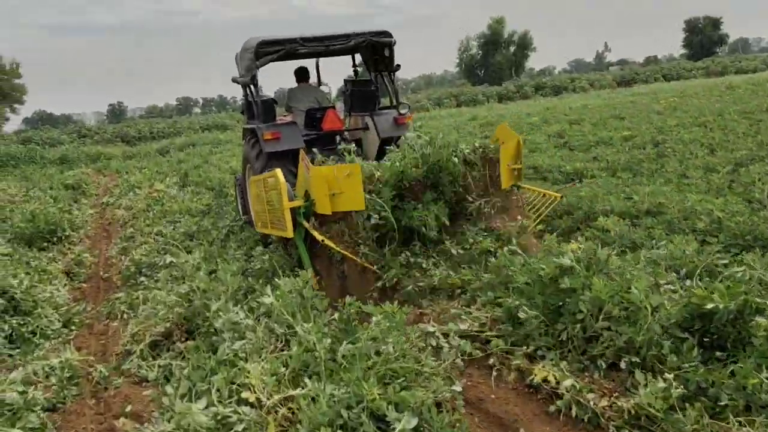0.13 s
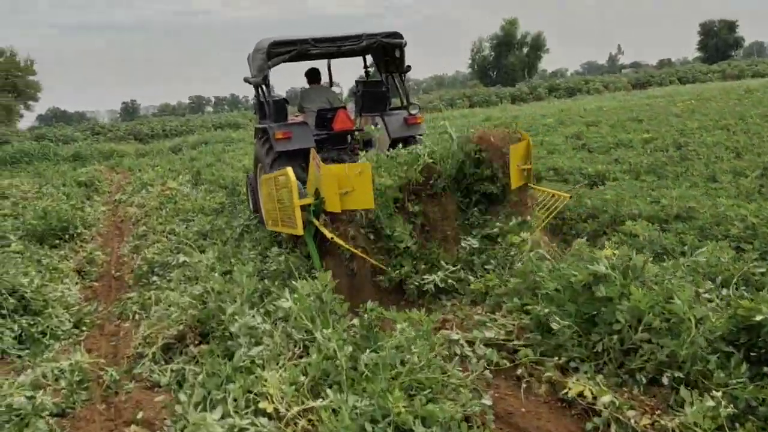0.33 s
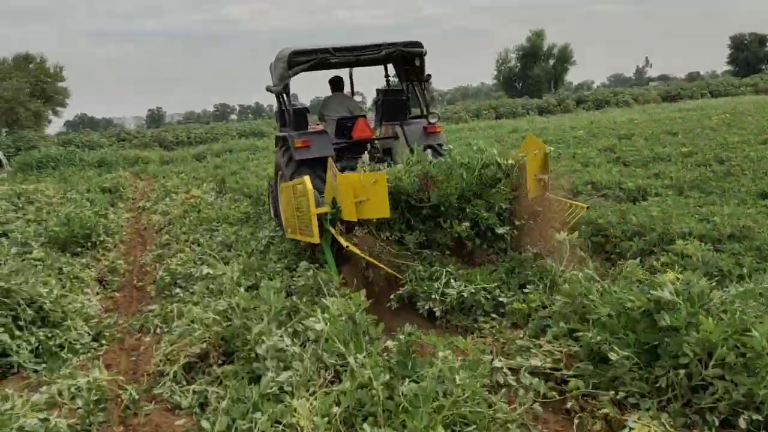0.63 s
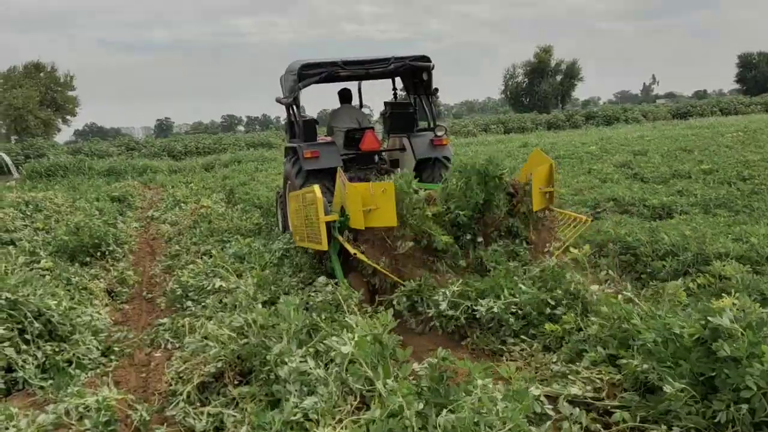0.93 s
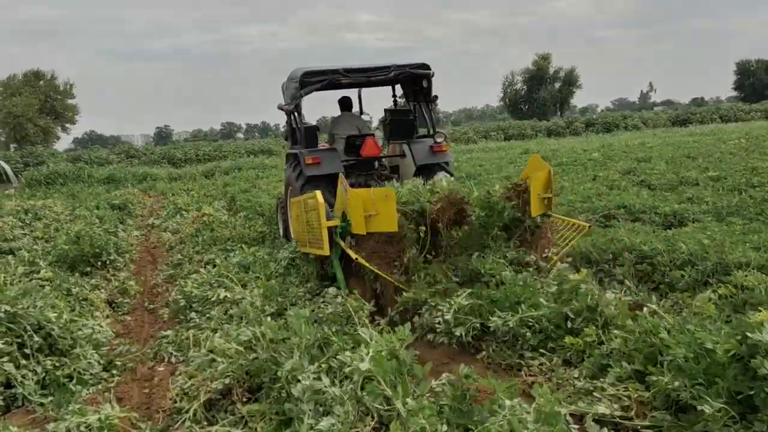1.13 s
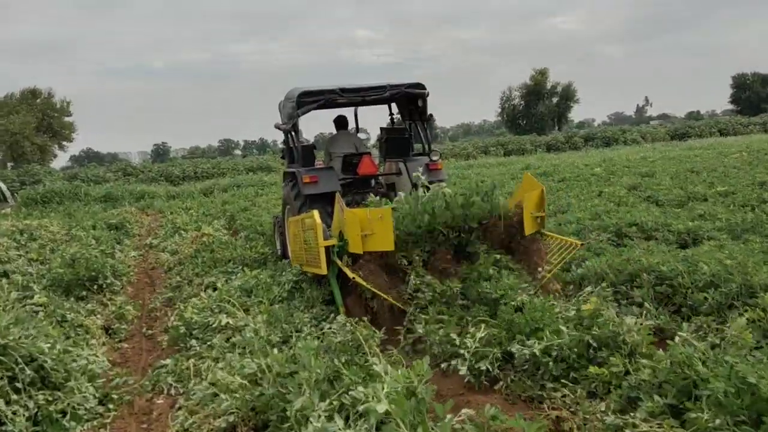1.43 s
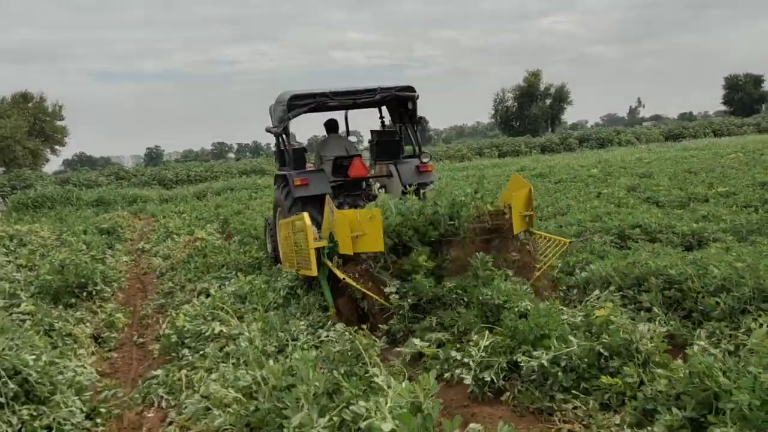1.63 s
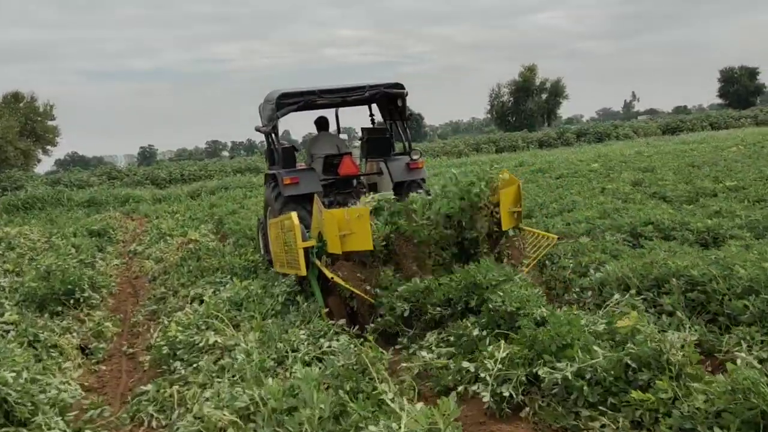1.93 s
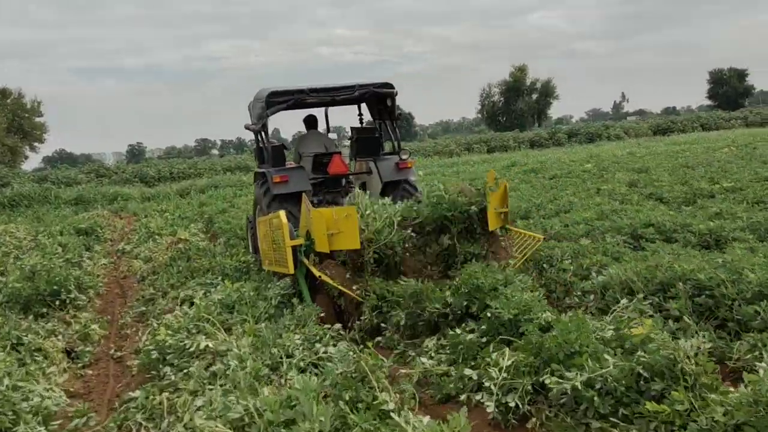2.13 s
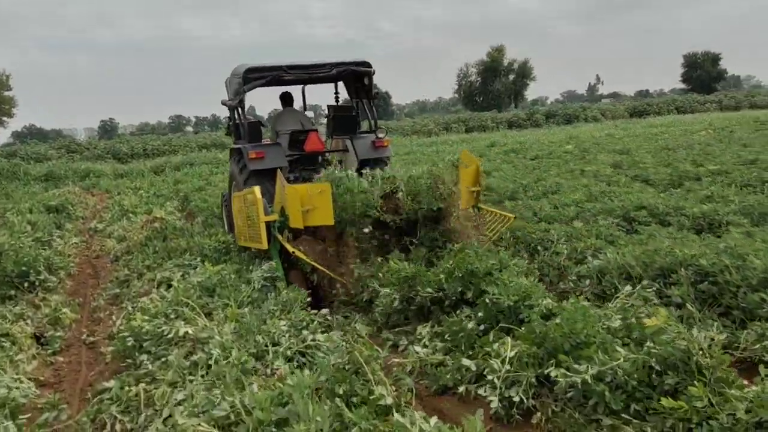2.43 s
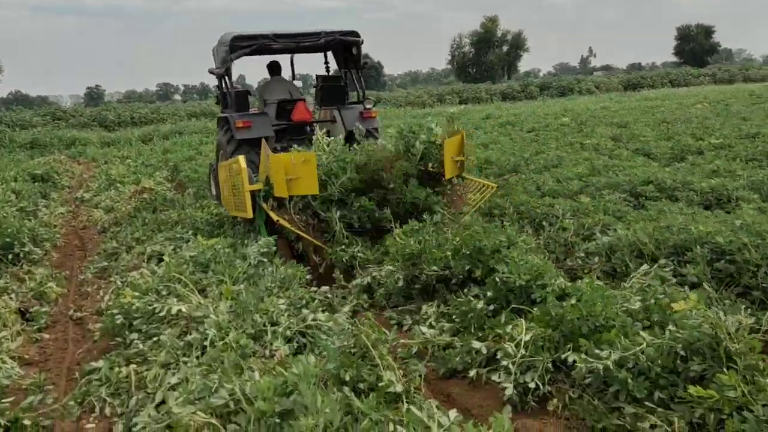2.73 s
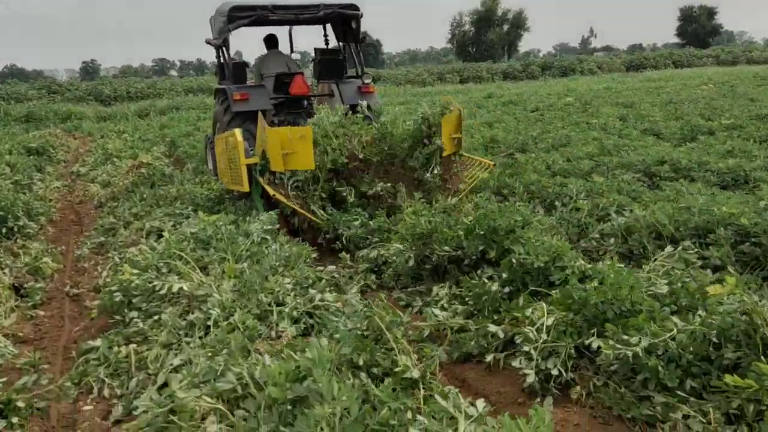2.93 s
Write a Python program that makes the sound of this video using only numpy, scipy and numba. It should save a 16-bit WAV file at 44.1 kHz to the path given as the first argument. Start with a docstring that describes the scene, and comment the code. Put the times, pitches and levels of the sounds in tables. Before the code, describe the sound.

A tractor's diesel engine hums and rumbles while its chain digger rattles loose metal continuously, some metres ahead of a hand-held phone in an open field; strong wind buffets the left side, then eases after midway.

```python
"""A diesel tractor drags a chain digger through a leafy field, some metres ahead of a hand-held phone.
Chain links and engine knock rattle loose sheet metal, built from many struck, wavering resonances.
The exhaust hums as sines on shaft orders; bright ticks, on some shaft turns, are clusters of brief partials.
Filtered noise makes the engine's low rumble and the gusts of wind that buffet the two microphone ports,
the left one most."""
import sys
import numpy as np
from scipy import signal
from scipy.fft import rfft, irfft
from scipy.io import wavfile
from scipy.ndimage import uniform_filter1d, map_coordinates
from numba import njit

SR = 44100
rng = np.random.default_rng(int(sys.argv[2]) if len(sys.argv) > 2 else 0)


def store_pcm(level_fs):
    """Save levels as 16-bit WAV."""
    pcm = np.round(np.clip(level_fs, -1, 1) * 32767).astype(np.int16)
    wavfile.write(sys.argv[1], SR, np.atleast_2d(pcm).T)


def gain_from_db(level_db):
    """Turn a decibel level (scalar or array-like) into a linear amplitude factor."""
    decades = np.asarray(level_db, float) / 20
    return 10 ** decades


N = 135387  # length in samples


def table(rows, x, col=1, log=False):
    """Read a column of a table along straight lines, on a log axis if asked."""
    a = np.array(rows, float)
    if log:
        return np.interp(np.log(x + 1), np.log(a[:, 0] + 1), a[:, col])
    return np.interp(x, a[:, 0], a[:, col])


def unit(x):
    """Scale to rms 1."""
    return x / np.sqrt(np.mean(x ** 2))


def walk(rate_hz, count=1, size=N, sr_hz=SR):
    """Random levels of rms 1, held for 1 / rate seconds and smoothed twice."""
    hold = max(int(sr_hz / rate_hz), 1)
    levels = rng.standard_normal((count, size // hold + 1))
    steps = np.repeat(levels, hold, axis=1)[:, :size]
    return unit(uniform_filter1d(uniform_filter1d(steps, hold), hold))


def shaped(x, gain):
    """Filter by a gain given on the frequency axis."""
    return irfft(rfft(x) * gain, N)


@njit
def ring(clicks, gate, pole, lag, gain, row):
    """Sum decaying resonances, each driven by gated clicks from its own starting point."""
    out = np.zeros(gate.shape[1])
    for m in range(len(pole)):
        z = 0j
        for i in range(len(out)):
            block = i >> 7  # pole and gain change every 128 samples
            strike = clicks[i + lag[m]] * gate[row[m], i] * gain[m, block]
            z = z * pole[m, block] + strike
            out[i] += z.imag
    return out


# Edges between the five rattle bands, low to high. Each entry: frequency in Hz.
BAND_EDGES_HZ = [850, 1300, 1950, 4700]
# Single panels that ring up for a while.
# Each row: middle in seconds, length in seconds, pitch in Hz, rise in dB.
RING_UPS = [(.26, 0.16, 1550, 12.5), (0.323, 0.14, 2345, 15), (0.462, 0.12, 2170, 17.5),
            (0.642, 0.082, 1990, 16.5), (0.87, 0.027, 2218, 21), (1.698, 0.085, 1120, 13.5),
            (1.874, 0.14, 654, 10), (1.955, .13, 1760, 9), (2.04, 0.095, 2260, 7.5), (2.127, .3, 2550, 12),
            (2.24, 0.14, 2130, 16), (2.243, 0.2, 1026, 11), (2.807, 0.3, 1225, 12.5),
            (2.82, 0.11, 1670, 11), (2.998, .12, 2550, 10)]
RING_UP_WIDTH = .014  # share of the pitch
PANEL_SPACE_HZ, PANEL_SPREAD = 40, .014  # spacing at the bottom, and its growth per Hz of pitch
PANEL_WIDTH_HZ, PANEL_WIDEN = 26, .009  # median bandwidth: a base, plus a share of the pitch
PANEL_WAVER, PANEL_WAVER_HZ = .007, 7  # pitch waver as a share, and its rate
PANEL_WALK_DB, PANEL_WALK_HZ, NEIGHBOUR_WALK_DB = 4.3, 12, 2
CLICK_SCATTER_DB = 2.2  # mean boost of a click


def panels(gate, count=125):
    """Loose metal rings at many pitches that waver and swell, partly with neighbours; three strikings."""
    u = (np.arange(count) + rng.uniform(0, 1, count)) / count
    stretch = np.log1p(PANEL_SPREAD * 15300 / PANEL_SPACE_HZ)
    hz = 200 + np.expm1(u * stretch) * PANEL_SPACE_HZ / PANEL_SPREAD
    width = (PANEL_WIDTH_HZ + PANEL_WIDEN * hz) * np.exp(.5 * rng.standard_normal(count))

    steps = N // 128 + 1
    slow = dict(count=count, size=steps, sr_hz=SR / 128)
    own = walk(PANEL_WALK_HZ, **slow)
    shared = unit(uniform_filter1d(walk(14, **slow), size=11, axis=0))
    t = np.arange(steps) * 128 / SR
    ups = 0
    for middle, length, pitch, rise_db in RING_UPS:
        near_pitch = np.exp(-(np.log(hz / pitch) / RING_UP_WIDTH) ** 2 / 2)
        near_time = np.exp(-(2 * (t - middle) / length) ** 4)
        ups = ups + rise_db * np.outer(near_pitch, near_time)
    swell = gain_from_db(ups + PANEL_WALK_DB * own + NEIGHBOUR_WALK_DB * shared)
    # wide or widely spaced rings are struck harder
    gain = swell * np.sqrt(width * (PANEL_SPACE_HZ + PANEL_SPREAD * hz))[:, None]

    waver = 1 + PANEL_WAVER * walk(PANEL_WAVER_HZ, **slow)
    pole = np.exp((2j * np.pi * hz[:, None] * waver - np.pi * width[:, None]) / SR)
    scatter = gain_from_db(CLICK_SCATTER_DB * rng.exponential(1, (3, 2 * N)))
    clicks = rng.standard_normal((3, 2 * N)) * scatter
    # each run of four neighbours takes the same stretch of clicks
    lag = rng.integers(0, N, count // 4 + 1)[np.arange(count) // 4]
    band = np.searchsorted(BAND_EDGES_HZ, hz)
    return rfft([unit(ring(c, gate, pole, lag, gain, band)) for c in clicks])


# Loudness of the rattle, band by band.
# Each row: time in seconds, then level in dB of the hiss (top band), the drone (lowest),
# the growl, the rasp and the clatter (rising in pitch).
RATTLE_LEVELS = [(0.0, -58.5, -48.5, -43, -46, -46.5), (0.04, -65, -56.5, -53, -55, -56),
                 (0.13, -62.5, -45, -48.5, -52.5, -51.5), (0.27, -60.5, -55, -51.5, -46.5, -49.5),
                 (0.36, -65, -47.5, -47.5, -53, -40.5), (0.39, -64, -53, -53, -51.5, -43.5),
                 (0.55, -67.5, -51, -55.5, -40, -48), (0.67, -55, -47.5, -45.5, -40.5, -38.5),
                 (0.91, -63, -52.5, -42.5, -40, -41), (0.93, -59, -42.5, -43, -45, -39),
                 (1.01, -64, -50, -46.5, -53, -43), (1.09, -66, -54, -49, -43, -47.5),
                 (1.17, -70, -44, -43, -50, -48.5), (1.22, -68.5, -50.5, -48, -56, -43),
                 (1.7, -58.5, -45.5, -40, -39, -42.5), (1.76, -58.5, -39, -41.5, -40, -36.5),
                 (1.97, -60.5, -49, -42.5, -45, -41.5), (2.02, -61.5, -48, -41, -47, -39.5),
                 (2.29, -67.5, -47.5, -43.5, -43.5, -41), (2.41, -61, -50, -49.5, -43, -42.5),
                 (2.85, -56, -51.5, -45, -40, -48), (3.07, -63.5, -51, -53.5, -50, -47.5)]
# How hard the chain links strike. Each row: time in seconds, strength in dB.
LINK_STRENGTH = [(0, 0.5), (.5, -3.5), (1.0, -4), (1.6, -3), (2.1, -4), (2.4, 2.5), (2.8, 3.5),
                 (3.07, -6.5)]
# Colour of the rattle. Each row: frequency in Hz, level in dB per Hz.
RATTLE_COLOUR = [(200, -40), (330, -22), (430, -10), (560, -6), (670, -3), (830, -12), (960, -6), (1110, 0),
                 (1260, -5), (1420, -8), (1530, -3), (1660, -5), (1800, -3), (1960, -11), (2260, -4),
                 (2360, -7), (2470, -4), (2680, -10), (2800, -8), (3000, -10), (3280, -9), (3600, -14),
                 (4200, -24), (5200, -32), (5900, -31), (6700, -42), (7600, -35), (9200, -35), (11000, -44),
                 (13300, -50), (14300, -42), (15500, -47)]
# Tilt of the rattle between the ports. Each row: frequency in Hz, left minus right in dB.
RATTLE_LEAN = [(100, 4), (700, -1), (1300, 5), (2400, 7), (4200, 10), (5800, -1), (7600, 10), (9300, -8),
               (10800, -6), (15000, 9)]
# Likeness of the two ports. Each row: frequency in Hz, shared part of the power from 0 to 1.
PORT_LIKENESS = [(100, 1), (640, 0.95), (1400, 0.68), (3100, 0.73), (5000, 0.4), (7000, 0.1), (15000, 0.1)]
# Delay of the left port. Each row: time in seconds, delay in seconds.
LEFT_DELAY = [(0, 0), (1.2, 0), (3.07, 7e-5)]
CHAIN_HZ, CHAIN_START_TURN = 62.5, .5  # links per second, first link phase
KNOCK_AT_TURN, HISS_AT_TURN = .5, .108  # share of a shaft turn
CHAIN_DEPTH, KNOCK_DEPTH, HISS_DEPTH = 1.86, .54, 1.6
SHARP = 1.84  # decay of a pulse over its cycle, in nepers
LINK_SCATTER_DB = 3  # from link to link, in each band


def pulse(phase):
    """Jump at each whole cycle and decay until the next."""
    return np.exp(-SHARP * (phase % 1))


def rattle(t, turn, hz):
    """Chain links and engine knock pulse the lower bands, shaft turns the hiss; each band has its level."""
    link = CHAIN_HZ * t + CHAIN_START_TURN
    scatter = LINK_SCATTER_DB * rng.standard_normal((len(BAND_EDGES_HZ), 300))
    strength = gain_from_db(table(LINK_STRENGTH, t) + scatter[:, link.astype(int)])
    chain = CHAIN_DEPTH * strength * pulse(link)
    knock = KNOCK_DEPTH * pulse(turn - KNOCK_AT_TURN)
    hiss_gate = 1 + HISS_DEPTH * pulse(turn - HISS_AT_TURN)
    rings = panels(np.vstack([1 + chain + knock, hiss_gate]))

    alike = np.clip(table(PORT_LIKENESS, hz, log=True), 0, 1)
    lean = np.array([[1], [-1]]) * table(RATTLE_LEAN, hz, log=True) / 2
    ports = np.sqrt(alike) * rings[0] + np.sqrt(1 - alike) * rings[1:]
    ports = ports * gain_from_db(table(RATTLE_COLOUR, hz, log=True) + lean)

    lows = [1 / (1 + (hz / edge) ** 16) for edge in BAND_EDGES_HZ]
    bands = np.diff([0 * hz] + lows + [1 + 0 * hz], axis=0)
    bands = np.roll(bands, 1, axis=0)  # hiss first, as in the level table
    left, right = sum(unit(irfft(ports * band, N)) * gain_from_db(table(RATTLE_LEVELS, t, col=k + 1))
                      for k, band in enumerate(bands))
    late = (t - table(LEFT_DELAY, t)) * SR
    return np.array([map_coordinates(left, [late], mode="mirror"), right])


# Partials of the exhaust hum. Each row: shaft order in cycles per turn, level in dB within the hum.
HUM_ORDERS = [(2, -13), (3, -2), (6, -24)]
# Loudness of the hum. Each row: time in seconds, gain in dB.
HUM_LEVEL = [(0, -38), (.5, -38.5), (.8, -48), (1.35, -37.5), (1.7, -51.5), (2.2, -51.5), (3.07, -49.5)]


def exhaust(t, turn):
    """Hum of sines locked to shaft orders, wavering a little in level and phase."""
    tone = 0
    for (order, db), sway in zip(HUM_ORDERS, walk(13, count=len(HUM_ORDERS))):
        tone = tone + gain_from_db(db + 1.5 * sway) * np.sin(2 * np.pi * order * turn + .33 * sway)
    return np.sqrt(2) * tone * gain_from_db(table(HUM_LEVEL, t))


# Ticks, on some of the shaft's turns. Each row: start in seconds, gain in dB, centre pitch in Hz.
TICKS = [(0.179, -55, 5400), (0.2144, -55, 5400), (0.3541, -55, 6020), (0.4199, -51, 5780),
         (0.5247, -57, 5980), (0.6305, -56, 5830), (0.7357, -48, 6080), (2.0213, -55, 5950),
         (2.0567, -51, 6000), (2.09, -48.5, 6000), (2.37, -58, 5750), (2.439, -51.5, 5630),
         (2.507, -49, 5640), (2.543, -53, 5600), (2.613, -48.5, 6030), (2.647, -44, 5770),
         (2.6838, -52, 6060), (2.7202, -47, 5500), (2.7535, -43, 6000), (2.7881, -46, 6340),
         (2.822, -40, 6200), (2.8584, -44, 5800), (2.9282, -51, 5700)]
TICK_WIDTH_HZ = 360  # scatter of the partials
TICK_S, TICK_RING_S = .0015, .0045  # swell of the tone and fade of the crack; fade of the tone
TICK_CRACK_DB, TICK_PAN_DB = -15, 3  # crack gain; left minus right


def tick():
    """Short bright ticks: nine close partials swell and fade under a crack of noise."""
    out, age = np.zeros(N + 2000), np.arange(2000) / SR
    fade = np.exp(-age / TICK_S)
    for start, db, hz in TICKS:
        partials = hz + TICK_WIDTH_HZ * rng.standard_normal((9, 1))
        tone = np.sin(2 * np.pi * (partials * age + rng.random((9, 1)))).sum(axis=0) / 4
        tone = 2 * tone * (1 - fade) * np.exp(-age / TICK_RING_S)
        crack = gain_from_db(TICK_CRACK_DB) * np.diff(rng.standard_normal(len(age) + 1)) * fade
        i = int(start * SR)
        out[i:i + len(age)] += gain_from_db(db) * (tone + crack)
    return out[:N] * gain_from_db(np.array([[1], [-1]]) * TICK_PAN_DB / 2)


# Colour of the engine rumble. Each row: frequency in Hz, level in dB per Hz.
RUMBLE_COLOUR = [(40, 1), (60, 6.5), (90, -1.5), (150, 5.5), (200, -0.5), (300, -4), (400, -5), (600, -35)]
RUMBLE_DB, RUMBLE_ALIKE = -53, .58  # rms level; shared part of the power


def rumble(hz):
    """The engine's low noise, over half its power shared by both ports."""
    both, left, right = rng.standard_normal((3, N)) * gain_from_db(.5 * walk(6.4))
    mix = np.sqrt(RUMBLE_ALIKE) * both + np.sqrt(1 - RUMBLE_ALIKE) * np.array([left, right])
    return unit(shaped(mix, gain_from_db(table(RUMBLE_COLOUR, hz, log=True)))) * gain_from_db(RUMBLE_DB)


# Gusts of wind. Each row: time in seconds, gain in dB, left minus right in dB.
GUSTS = [(0.0, -38, 11), (0.03, -32, 15), (0.06, -31.5, 4), (0.18, -32, 5.5), (0.23, -28, 17),
         (0.28, -33, 4.5), (0.32, -26.5, 24), (0.38, -33.5, -1), (0.4, -26, 15), (0.43, -34.5, 12.5),
         (0.55, -35, -6), (0.59, -39.5, 3), (0.65, -44.5, -18), (0.73, -53.5, -1), (0.85, -49.5, -23),
         (0.92, -50.5, 6), (0.96, -33.5, 35), (1.01, -34.5, -3), (1.04, -33, 9), (1.11, -33, 4),
         (1.23, -27.5, 13), (1.34, -35, 14), (1.36, -28.5, 12.5), (1.54, -35, 11), (1.7, -60.5, -10),
         (2.23, -59.5, -3), (2.26, -43, 9.5), (2.35, -39.5, 10), (2.53, -68, -11), (2.57, -41, -4),
         (2.67, -39.5, 11), (2.75, -42, 9), (2.81, -55, -3), (2.95, -38.5, 9.5), (2.98, -41.5, 4),
         (3.07, -41.5, 10)]
# Colour of the wind on the left port. Each row: frequency in Hz, level in dB per Hz.
WIND_LEFT_COLOUR = [(20, -34), (45, -39), (65, -33), (90, -7.5), (130, 0), (190, 0.5), (300, -5),
                    (400, -13.5), (520, -20), (800, -64), (1500, -79)]
# Colour of the wind on the right port. Each row: frequency in Hz, level in dB per Hz.
WIND_RIGHT_COLOUR = [(20, -18), (45, -4), (65, -43), (90, 2), (150, 6), (190, 5), (260, -12), (400, -12),
                     (800, -77), (1500, -85)]
BUFFET_DB, BUFFET_HZ = 1.3, 35  # flutter depth and rate


def wind(t, hz):
    """Eddies thump each port on their own: two unrelated low noises that flutter."""
    ratio = gain_from_db(2 * table(GUSTS, t, col=2))  # left power over right power
    share = np.sqrt(np.array([ratio, np.ones(N)]) / (1 + ratio))
    eddies = rng.standard_normal((2, N)) * gain_from_db(BUFFET_DB * walk(BUFFET_HZ, count=2))
    colours = (WIND_LEFT_COLOUR, WIND_RIGHT_COLOUR)
    ports = [unit(shaped(e, gain_from_db(table(c, hz, log=True)))) for e, c in zip(eddies, colours)]
    return 2 * share * np.array(ports) * gain_from_db(table(GUSTS, t))


# Speed of the engine shaft. Each row: time in seconds, speed in turns per second.
SHAFT_SPEED = [(0, 28.8), (1.3, 28.8), (2.4, 28.6), (3.07, 28.6)]


def scene():
    """Tractor, digger and wind at the two ports, on one shared shaft angle."""
    t, hz = np.arange(N) / SR, np.arange(N // 2 + 1) * SR / N
    turn = np.cumsum(table(SHAFT_SPEED, t)) / SR
    return rattle(t, turn, hz) + exhaust(t, turn) + tick() + rumble(hz) + wind(t, hz)


def top_cut(x):
    """Nothing passes above the cut-off."""
    return signal.sosfilt(signal.butter(12, 15500, fs=SR, output="sos"), x)


def record(dry):
    """The microphone loses the deepest bass through a third-order high-pass."""
    low_cut = signal.butter(3, 65.4, "high", fs=SR, output="sos")  # Hz
    mix = signal.sosfilt(low_cut, dry)
    return top_cut(mix)


dry = scene()
out = record(dry)
store_pcm(out)
```